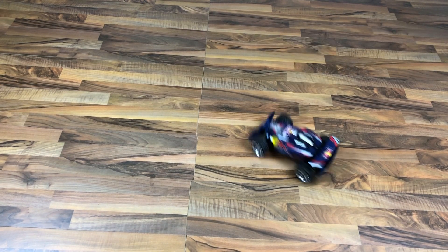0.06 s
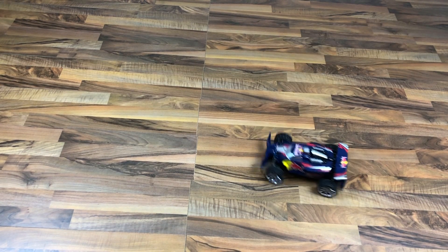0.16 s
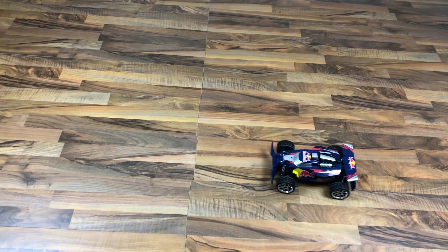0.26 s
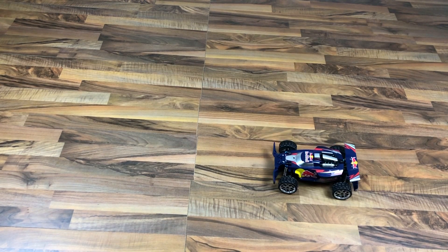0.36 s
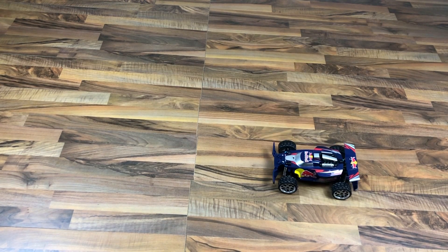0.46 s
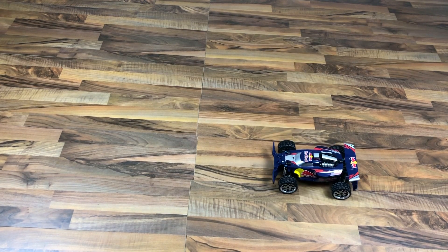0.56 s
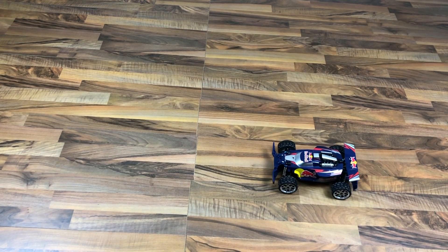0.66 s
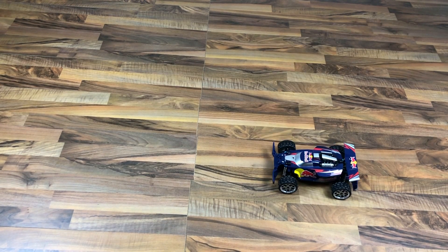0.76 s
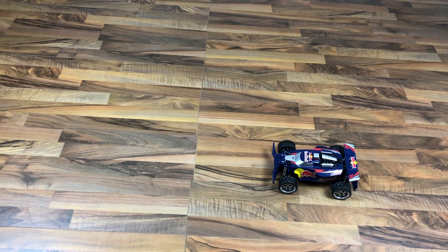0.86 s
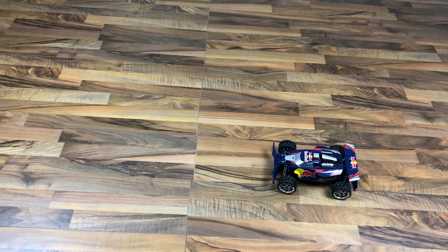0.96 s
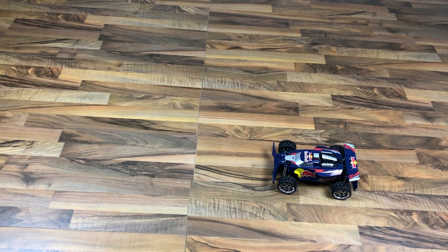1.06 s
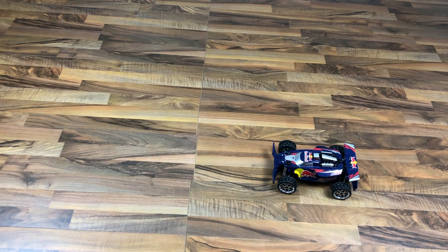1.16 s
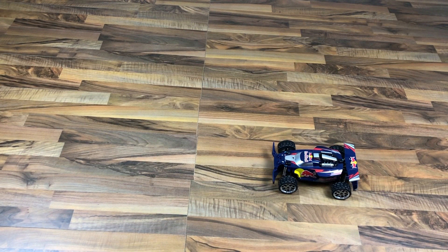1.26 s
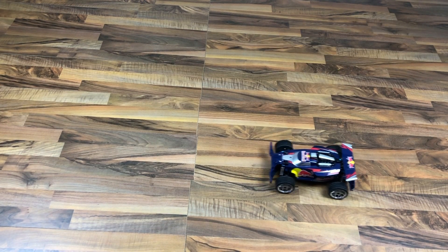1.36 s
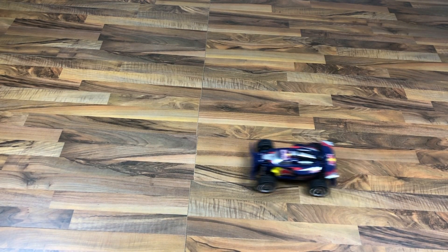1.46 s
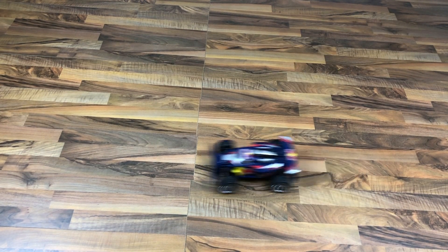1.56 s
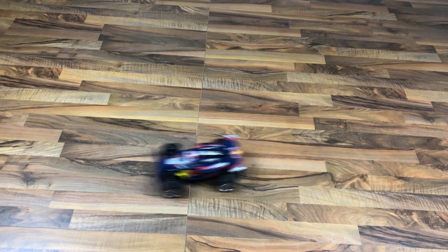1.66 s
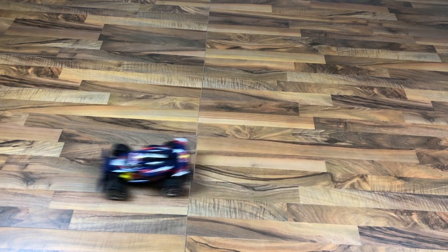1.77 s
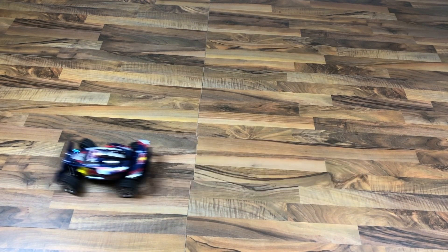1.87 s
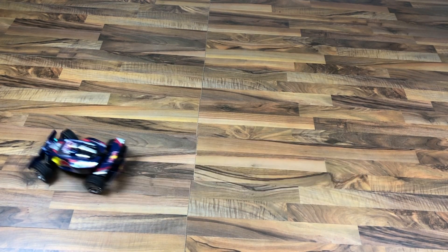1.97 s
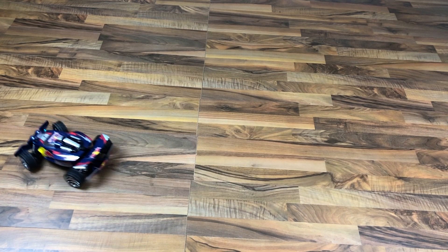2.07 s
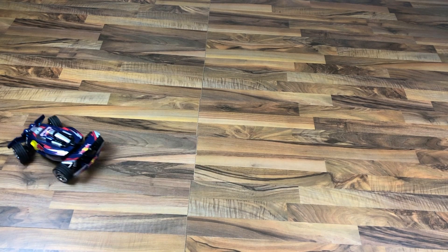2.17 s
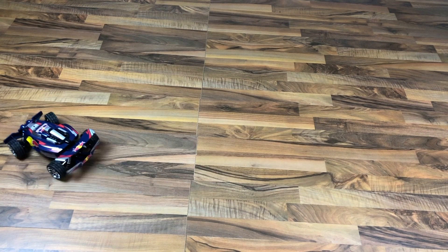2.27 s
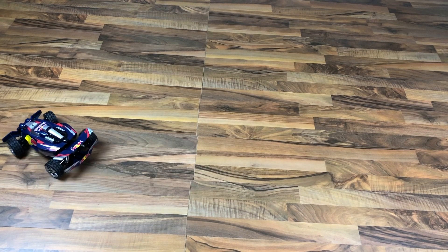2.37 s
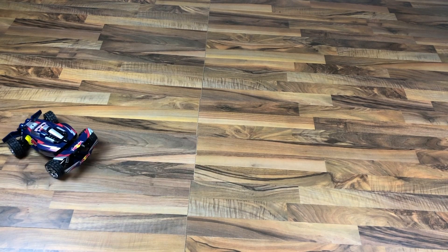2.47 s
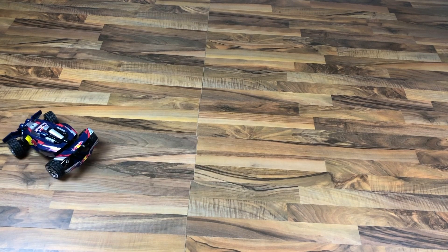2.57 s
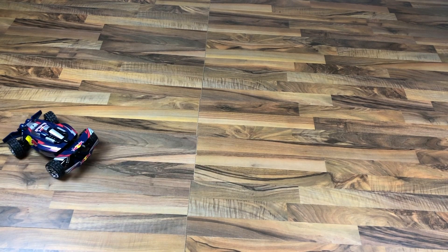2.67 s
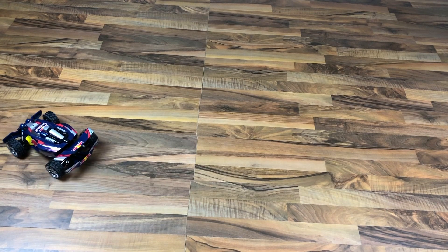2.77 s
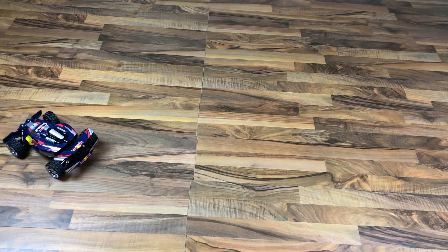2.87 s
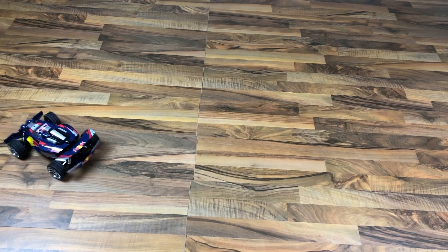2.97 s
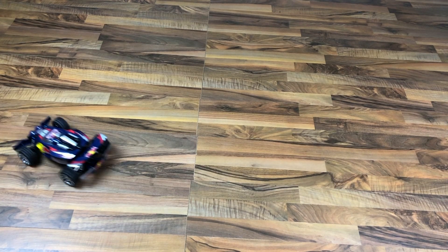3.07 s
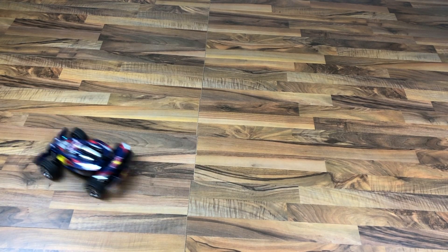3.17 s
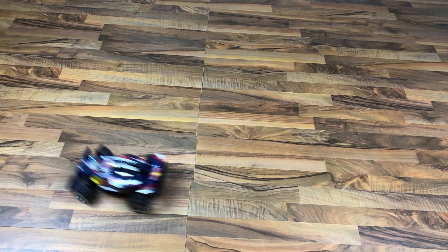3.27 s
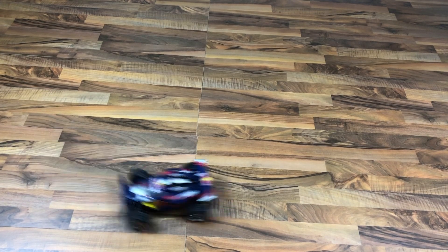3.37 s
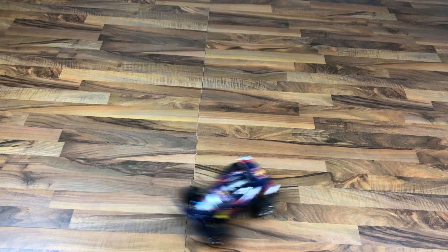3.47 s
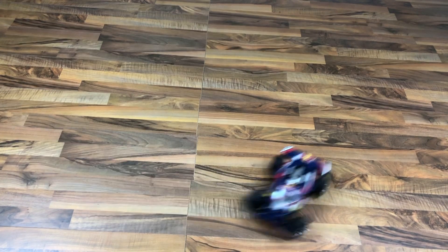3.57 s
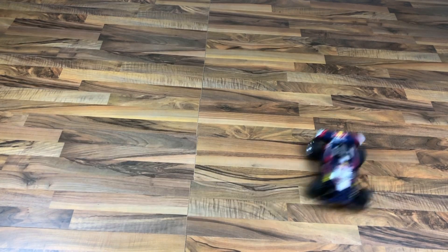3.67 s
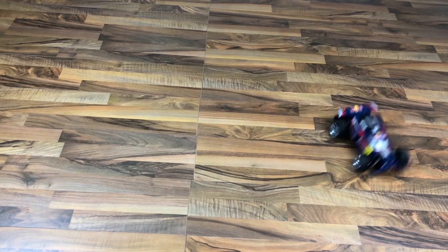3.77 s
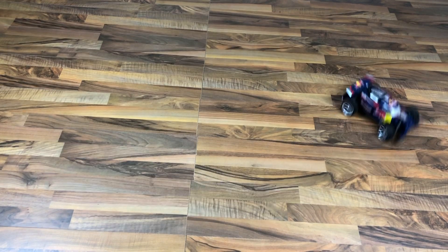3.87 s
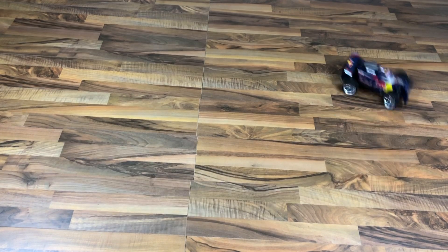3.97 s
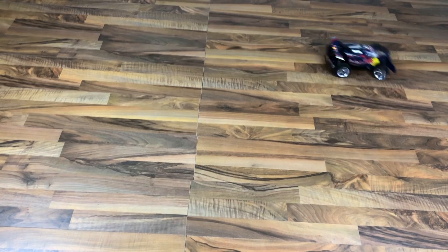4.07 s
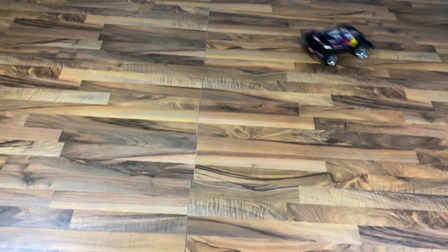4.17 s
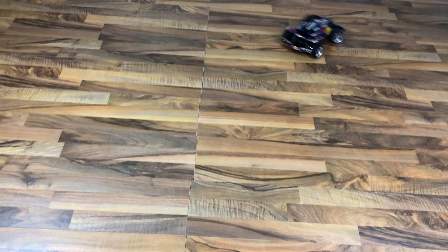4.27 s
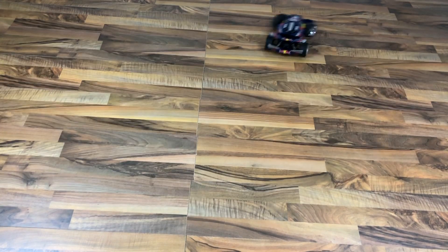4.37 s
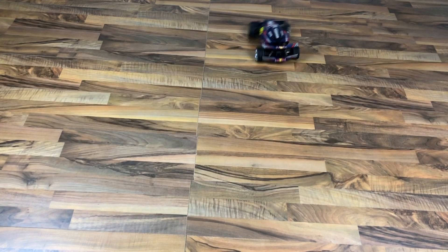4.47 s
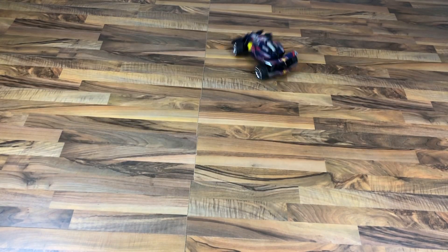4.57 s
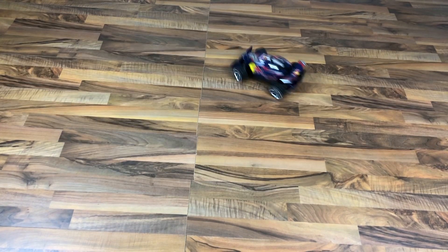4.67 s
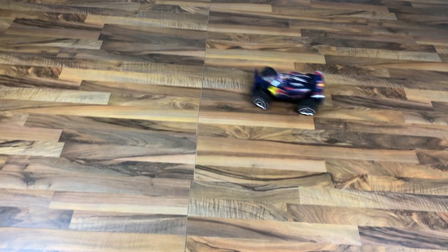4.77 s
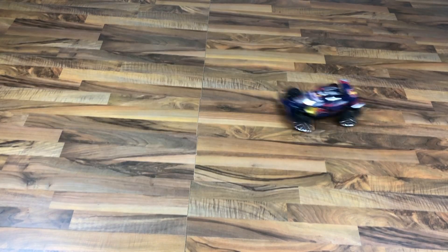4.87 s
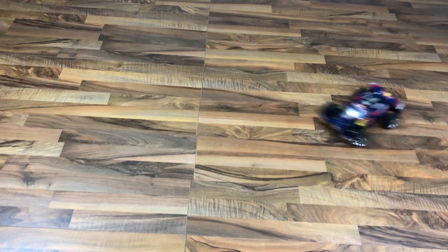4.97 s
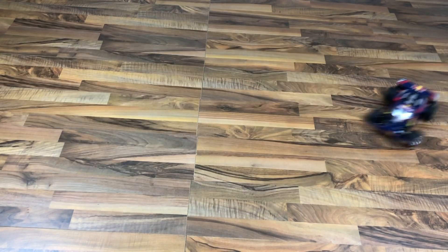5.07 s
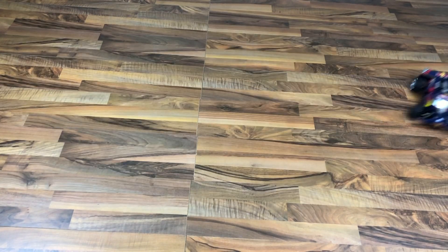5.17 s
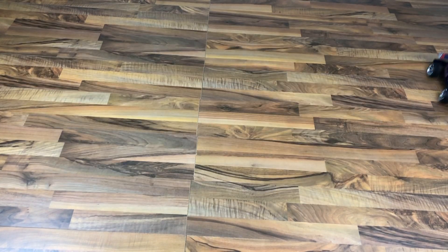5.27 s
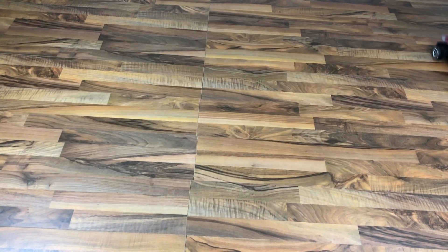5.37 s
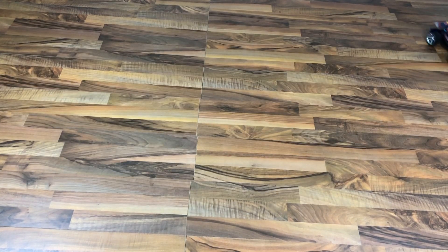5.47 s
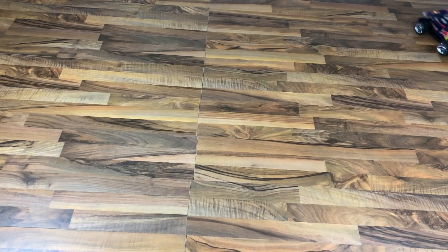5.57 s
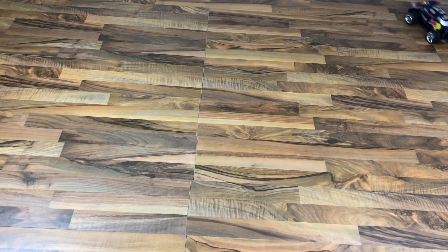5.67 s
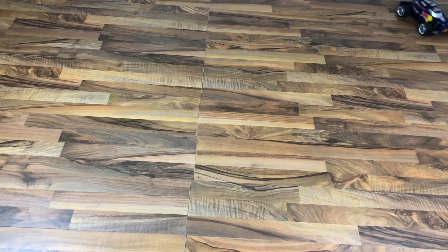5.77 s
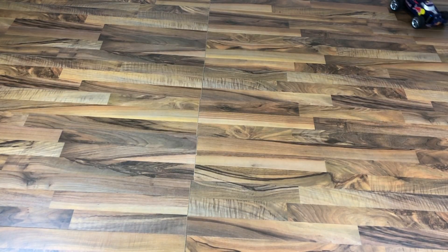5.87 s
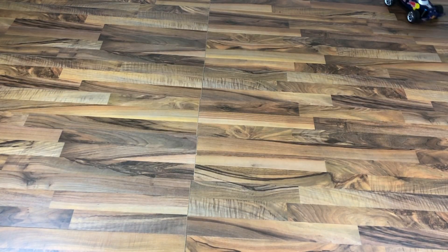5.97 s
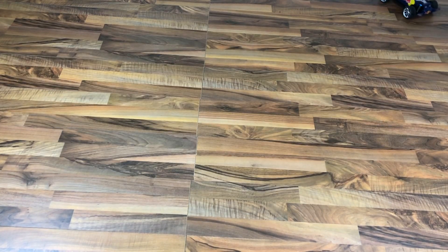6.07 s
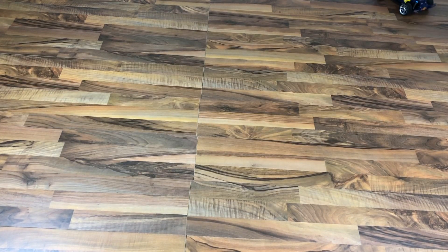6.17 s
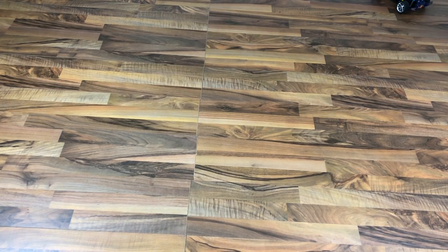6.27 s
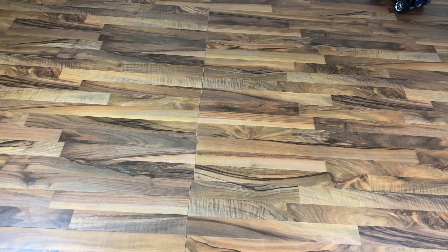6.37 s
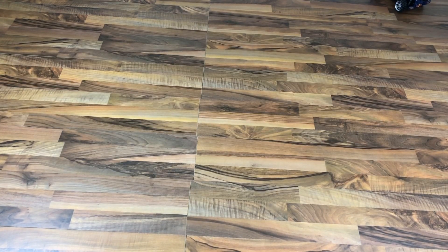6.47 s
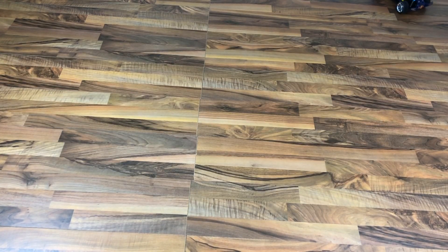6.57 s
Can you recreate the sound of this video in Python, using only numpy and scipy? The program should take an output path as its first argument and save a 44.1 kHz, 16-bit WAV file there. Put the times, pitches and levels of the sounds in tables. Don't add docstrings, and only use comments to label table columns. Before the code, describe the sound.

A small battery toy car whirs and rattles across a hard indoor floor in a short burst, then a long drive, clacking as it coasts out.

```python
import sys
import numpy as np
from scipy import signal
from scipy.io import wavfile
from scipy.ndimage import uniform_filter1d

SR = 44100
rng = np.random.default_rng(int(sys.argv[2]) if len(sys.argv) > 2 else 0)


def waveform_to_disk(signal):
    frames = np.transpose(np.atleast_2d(signal))
    scaled = np.clip(frames, -1, 1) * 32767
    samples = np.round(scaled).astype(np.int16)
    wavfile.write(sys.argv[1], SR, samples)


def invert_db(x):
    u = np.asarray(x, float) / 20
    return 10 ** u


N = 291942

# [t/s, level/dB]
GEAR_DRIVE = [
    [(0.0, -30), (0.15, -39), (0.32, -49), (0.358, -54), (0.41, -56)],
    [(1.395, -45.5), (1.453, -43), (1.513, -28), (1.625, -23), (1.765, -31.5), (2.179, -40.5),
     (2.352, -50.5)],
    [(2.986, -50), (3.015, -41), (3.035, -48), (3.07, -48), (3.125, -36), (3.22, -29), (3.36, -25.9),
     (3.9, -26.2), (5.158, -26.1), (5.34, -28.5)],
    [(5.342, -28.5), (5.378, -38), (5.468, -41.5), (5.802, -40.5), (6.13, -44), (6.2, -50), (6.29, -53.5),
     (6.48, -59), (6.575, -72)],
]
# [start t/s, spin-up/s, release t/s]
STARTS = [
    (1.394, .23, 1.75),
    (2.99, .37, 5.35),
    (6.576, .3, 7.0),
]
# [f/Hz, density/dB per Hz]
BODY_SPECTRUM = [(29, -40), (50, -15), (119, -8.5), (222, -7.5), (303, -4), (527, -12), (730, -12),
                 (880, -6), (1220, -4), (1630, -0.5), (2230, -5), (4060, -3), (11400, -8.5), (15600, -9.5)]
# [f/Hz, width/Hz, lift/dB]
SHELL_MODES = [(930, 82, 6.5), (1270, 90, 1), (1560, 260, 2.5), (1920, 170, 4), (3020, 200, .7),
               (4050, 400, 2.5), (5350, 450, 3), (7000, 300, 2), (8900, 120, 2.5), (11130, 350, 5.5),
               (13300, 200, 2.5)]
# [start t/s, end t/s, f/Hz, level/dB]
FLARES = [(0, .12, 1980, -42), (.06, .45, 1950, -48), (1.43, 1.5, 1900, -38), (1.492, 1.518, 1880, -28),
          (1.545, 1.615, 1840, -33), (2.25, 2.5, 1950, -54), (5.41, 5.46, 2020, -43), (5.9, 6.3, 930, -50),
          (4.45, 4.7, 4150, -37), (4.75, 5.05, 4150, -36), (3.6, 3.8, 4050, -37), (3.9, 4.25, 3050, -42),
          (5.7, 5.85, 4700, -49), (5.6, 5.8, 3650, -53), (5.61, 5.64, 5250, -49), (1.48, 1.58, 7100, -36),
          (1.52, 1.6, 5500, -34), (0, .16, 990, -47), (.12, 0.447, 985, -50), (1.6, 1.65, 4600, -30),
          (1.655, 1.72, 4720, -30), (1.54, 1.6, 4750, -35), (1.62, 1.68, 4050, -34),
          (1.66, 1.73, 3500, -33), (1.6, 1.69, 5400, -35), (1.98, 2.14, 1825, -51), (1.902, 2.15, 925, -47),
          (1.78, 2.1, 5600, -44), (2.35, 2.47, 1270, -51), (3.17, 3.26, 7350, -34), (3.26, 3.31, 7700, -33),
          (3.28, 3.345, 7250, -31), (4.02, 4.2, 5100, -34), (1.9, 2.35, 7300, -50), (3.25, 3.32, 940, -34),
          (3.3, 3.45, 5450, -34), (3.582, 3.66, 6050, -35), (3.65, 3.8, 4790, -35), (4.05, 4.25, 4050, -35),
          (4.85, 5.0, 5440, -32), (5.25, 5.36, 4100, -34), (5.65, 6.2, 1270, -46.5), (5.76, 6.3, 2055, -46),
          (1.45, 1.7, 9000, -34), (3.08, 3.17, 9900, -40), (.95, 1.0, 5000, -64), (1.15, 1.19, 4700, -72),
          (1.28, 1.33, 10300, -68)]
# [t/s, hold/s, level/dB, chassis re level/dB, hiss re
# level/dB]
SHUDDERS = [
    (0.413, .015, -45.5, 1, -10),
    (0.884, .01, -68, -10, -5),
    (1.008, .015, -66, 8, -6),
    (2.356, .115, -48, 1, -11),
    (2.5918, .004, -61, 8.5, -15),
    (2.999, .015, -49, -6, -3),
    (6.307, .065, -49, -2, -6),
    (6.38, .07, -47, -2, -6),
    (6.577, .05, -50, 4, -14),
]
# [t/s, hold/s, level/dB, chassis re level/dB, hiss re level/dB]
SWINGS = [
    (0.982, .075, -62, 1, 1),
    (1.306, .05, -66, 0, 7),
    (2.777, .06, -61.5, 4, 3),
]
# [t/s, rotation f/Hz, level/dB]
SHAFT_RUNS = [
    [(-.01, 390, -43), (.05, 310, -46), (.12, 232, -48)],
    [(1.44, 206, -65), (1.49, 240, -46), (1.57, 280, -39), (1.63, 312, -45), (1.668, 385, -38),
     (1.73, 305, -37), (1.775, 200, -52)],
    [(3.3, 211, -50), (3.41, 250, -44), (3.76, 328, -37), (3.93, 308, -41), (4.1, 310, -38),
     (4.25, 342, -51), (4.75, 335, -51), (4.96, 305, -38), (5.31, 280.5, -40.5)],
]
# [multiple, level/dB]
SHAFT_ORDERS = [
    (1, -3),
    (2, -15),
    (1.09, -10),
    (.6, -14),
]
# [t/s, f/Hz, level/dB]
MESH_RUNS = [
    [(1.46, 800, -50), (1.52, 1250, -41), (1.545, 1500, -37), (1.57, 1800, -36), (1.6, 1980, -35),
     (1.62, 1880, -40), (1.67, 1800, -40), (1.74, 1700, -47)],
    [(3.38, 1300, -46), (3.5, 1380, -44), (3.63, 1540, -39), (3.76, 1690, -36.5), (3.85, 1620, -43),
     (4.0, 1610, -39), (4.16, 1550, -35), (4.23, 1480, -46), (4.52, 1320, -48)],
    [(4.66, 1510, -43), (4.76, 1490, -37), (4.92, 1400, -41), (5.05, 1420, -44), (5.2, 1520, -42),
     (5.36, 1540, -43)],
]
# [start t/s, length/s, from f/Hz, to f/Hz, level/dB]
GLIDES = [(1.63, .14, 945, 860, -34), (1.53, .17, 1830, 1850, -30), (1.57, .05, 1930, 1990, -31),
          (1.4, .13, 1935, 1880, -39), (1.44, .09, 900, 1010, -44), (1.44, .1, 1330, 1260, -44),
          (3.08, .18, 715, 700, -51), (3.22, .38, 960, 835, -44), (3.66, .34, 860, 950, -44),
          (4.1, .14, 975, 960, -41), (4.32, .34, 705, 575, -42), (4.28, .2, 1040, 1100, -42),
          (4.48, .4, 1000, 820, -42), (5.07, .26, 945, 820, -41), (5.3, .13, 880, 970, -41),
          (4.22, .3, 350, 335, -44), (4.72, .16, 345, 340, -42), (.06, .06, 570, 540, -50),
          (0, .14, 1040, 985, -46), (.19, .13, 965, 955, -50), (3.25, .12, 390, 385, -47),
          (6.25, .2, 590, 600, -62), (6.57, .05, 590, 590, -58), (5.25, .14, 570, 565, -52),
          (.02, .11, 1740, 1720, -45), (.14, .2, 1960, 1910, -50), (.14, .1, 1740, 1720, -51),
          (.14, .1, 1220, 1215, -52), (.39, .06, 1195, 1195, -48), (.0, .07, 1370, 1350, -48),
          (1.43, .07, 485, 485, -50)]
# [start t/s, length/s, from f/Hz, to f/Hz, level/dB]
DRUMMING = [(-.02, .08, 190, 150, -43), (.11, .08, 105, 120, -50), (1.74, .24, 160, 118, -47),
            (2.04, .11, 160, 150, -53), (3.15, .3, 150, 150, -46), (4.25, .35, 85, 95, -48),
            (5.12, .3, 170, 158, -44), (5.4, .21, 128, 118, -42), (.15, .16, 85, 78, -53),
            (1.97, .2, 82, 76, -53), (5.58, .24, 86, 77, -45), (5.76, .2, 128, 128, -51),
            (1.68, .17, 90, 86, -53), (3.42, .17, 74, 72, -52), (5.47, .15, 235, 200, -52),
            (5.62, .1, 150, 150, -54), (6.0, .2, 150, 135, -57), (5.7, .12, 235, 220, -57)]
# [t/s, peak level/dB, chassis re peak/dB, top re peak/dB]
CLACKS = [(0.38, -33, -6, -17), (0.412, -27, -12, -21), (0.417, -24, -6, -21), (0.44, -35, -11, -24),
          (0.6204, -52, -1, -3), (0.8863, -51.5, -8, -8), (0.9465, -53, 0.5, -9), (1.0029, -42, -3, -11),
          (1.009, -48, 4, -14), (1.1548, -53, 3, -18), (1.2745, -52, -6, -4), (1.289, -50, -12, -5),
          (1.3985, -24, -3, -19), (1.492, -20, -9, -12), (2.3565, -25, -9, -21), (2.378, -28, -4.5, -19),
          (2.395, -28, -8.5, -19), (2.426, -32, -13, -19), (2.452, -38, -8, -20), (2.5455, -58, 3, -20),
          (2.5898, -40, 1, -19.5), (2.7456, -48, -10, -6), (2.7606, -46, -12, -6), (2.7686, -33, -2, -8),
          (2.786, -46, 6, -14), (2.815, -44.5, 7, -21), (2.9875, -37, -2.5, -6), (2.9995, -26, -7, -8),
          (6.2359, -28, -14, -14), (6.2923, -30, -16, -16), (6.308, -23.5, -8.5, -17),
          (6.345, -28, -10, -3), (6.3812, -18, -10, -21), (6.4015, -24, -9.5, -14), (6.4194, -32, -12, -16),
          (6.4512, -26, -19, -20), (6.4737, -29, -6, -20)]
# [t/s, peak level/dB]
TICKS = [(.2009, -32), (.2967, -34), (1.893, -26), (1.992, -27), (2.2921, -37), (2.3221, -38), (5.558, -30),
         (6.0309, -33), (6.191, -38), (6.268, -40), (5.4717, -29), (5.4996, -31), (5.6133, -28),
         (5.6831, -26), (5.7154, -29), (5.759, -19), (5.7865, -23), (5.8064, -23), (5.8408, -24),
         (5.8665, -33), (5.8932, -31), (5.9416, -27), (5.9491, -25), (5.9695, -27), (5.996, -28),
         (6.0596, -26), (6.0907, -26), (6.165, -28), (6.219, -30)]
# [f/Hz, width/Hz, lift/dB]
RIB_MODES = [
    (960, 80, 7),
    (1270, 90, 5),
    (2000, 140, 5),
    (3620, 200, 6),
    (4700, 220, 8),
    (6750, 300, 5),
    (11120, 220, 4),
]
# [t/s, f/Hz, peak level/dB, T60/s]
PINGS = [(2.5898, 1150, -42, .03), (2.5898, 4700, -52, .02), (2.604, 1150, -50, .04),
         (2.7686, 1000, -37, .035), (2.7686, 4750, -44, .025), (2.785, 1050, -42, .03),
         (2.815, 2100, -46, .03), (2.819, 620, -48, .06), (2.9985, 11000, -33, .03),
         (2.9995, 4500, -36, .04), (2.9995, 6300, -37, .03), (3.011, 9700, -34, .03),
         (3.012, 4400, -38, .03), (3.021, 9300, -39, .02), (6.3812, 3500, -33, .025),
         (6.3812, 1800, -34, .025), (1.009, 600, -56, .06), (6.091, 11100, -40, .05),
         (6.452, 11100, -44, .06)]
# [t/s, rise/s, hold/s, level/dB]
WHINES = [
    (1.394, .012, .032, -39),
    (2.998, .022, .034, -35),
    (6.575, .01, .05, -43.5),
]
# [multiple, level at start 1/dB, at start 2/dB, at start 3/dB]
WHINE_ORDERS = [
    (1, -12, -21, -16),
    (2, 0.5, 0, -1.5),
    (3, -14, -21, -5.5),
    (4, -3, -5, -4),
    (5, -21, -21, -12),
    (6, -20, -24, -22),
    (8, -16.5, -23, -4),
    (10, -24, -23, -20),
]
# [start t/s, length/s, level/dB]
STEER_WHISTLES = [(.492, .03, -55), (.545, .025, -54), (.61, .02, -55.5), (.935, .03, -54),
                  (.985, .05, -54), (1.266, .016, -52), (1.288, .025, -52), (1.335, .022, -52),
                  (1.375, .02, -57), (2.25, .09, -59), (2.732, .03, -53), (2.775, .075, -58),
                  (5.93, .06, -56), (6.11, .05, -56), (6.445, .12, -57)]
# [f/Hz, density/dB per Hz]
QUIET_SPECTRUM = [(15, -44), (25, 2), (137, -4), (222, -9), (275, -13), (951, -18), (1250, -23.5),
                  (1590, -25.5), (11700, -34.5), (14500, -33.5), (15700, -37)]
GROUP_EDGES_HZ = [230, 760, 2500, 4500, 9000]

QUIET_DB, CUTOFF_HZ = -63, 15790
ROOM_T60_S, ROOM_DB = .35, -12
FULL_DB = -26
CHASSIS, HISS, DRONE, ROLLING = (-31.2, .75), (-28, 1.15), (-39.5, .82), (-48.5, .42)
SPIN_SHARES = (0, .3, .55, 1)
SPIN_HISS_DB, SPIN_STRAIN_DB, SPIN_CLATTER_DB = (-5, 8, 4, 0), (2.5, 3.5, 1, 0), (0, -1, -4, 0)
AFTER_S, AFTER_DRONE_DB, AFTER_CLATTER_DB = (0, .08, .45, .8), (1, 4, -4, -9), (0, -.6, -2.2, -1.5)
SLACK_HELD_DB, SLACK_FREE_DB, SLACK_SLOW_DB, FREE_S, SLOW_S = .42, 1.4, 2.2, .2, .75
STRIKES_PER_S, STRIKE_FADE_S = 70, .007
WANDER_SAMPLES, WANDER_PER_S = 28, 2.5
SWELL_S, SWELL_DB, FALL_S, TAIL_S, TAIL_DB_PER_S = .036, 8, .06, .2, 125
HOLD_SAG_DB_PER_S, FALL_DB_PER_S, SHUDDER_DRONE_DB, SWING_DRONE_DB = 35, 280, -21, -5
SAG_HZ_PER_S, LET_GO_S, LET_GO_DB, RUN_OUT_S, RUN_OUT_DB = 260, .09, 9, .34, 15
DRUM_RISE, DRUM_FALL, DRUM_ENDS_DB = .25, .3, 11
WHINE_HZ, WHINE_FALL_S, WHINE_LINGER_S = 485, .012, .07
WHINE_START_DB, WHINE_HOLD_DB, WHINE_FALL_DB = 10, 2, 10
STEER_HZ, STEER_RISE_S, STEER_FALL_S, STEER_RISE_DB, STEER_FALL_DB = 15680, .015, .04, 8, 22


def gears(per_s, size_db, smooth):
    knocks = rng.random((2, N)) < per_s * invert_db(3.0 * drift(60)) / SR
    sizes = invert_db(size_db * np.minimum(rng.exponential(1, (2, N)), 4)) * rng.choice([-1, 1], (2, N))
    shake = rms_one(knocks * sizes) + smooth * rng.standard_normal((2, N))
    shake = fine_modes(shell(shake, SHELL_MODES), lift_db=3.2, count=44)

    roll, drone, chassis, clatter, rattle, hiss = bank(shake, BODY_SPECTRUM, patchy_db=.8, step=.38)
    rattle = clatter * invert_db(since_start(SPIN_CLATTER_DB) + since_release(AFTER_CLATTER_DB)) + rattle
    roll, drone, chassis, rattle, hiss = [rms_one(g) for g in (roll, drone, chassis, rattle, hiss)]

    lumps = invert_db(slack() * (strikes() - .3))
    chassis = chassis * lumps ** .6
    rattle = rattle * lumps
    hiss = hiss * lumps ** 1.2

    swing = in_time(GEAR_DRIVE, column=1) / invert_db(FULL_DB)
    strain = invert_db(since_start(SPIN_STRAIN_DB))

    def follows(full_db, share):
        return invert_db(full_db) * swing ** share

    rattle_gain = follows(FULL_DB, share=1) + shudders(column=0)
    chassis_gain = follows(*CHASSIS) * strain + shudders(column=1)
    hiss_gain = follows(*HISS) * invert_db(since_start(SPIN_HISS_DB)) + shudders(column=2)
    drone_gain = follows(*DRONE) * strain * invert_db(since_release(AFTER_DRONE_DB)) + shudders(column=3)
    return (rattle * rattle_gain + chassis * chassis_gain + hiss * hiss_gain
            + drone * drone_gain + roll * follows(*ROLLING))


def slack():
    points = [(0, SLACK_HELD_DB), (FREE_S, SLACK_FREE_DB), (SLOW_S, SLACK_SLOW_DB)]
    for s, spin, off in STARTS:
        points += [(s, SLACK_FREE_DB), (s + .6 * spin, SLACK_HELD_DB), (off, SLACK_HELD_DB)]
        points += [(off + FREE_S, SLACK_FREE_DB), (off + SLOW_S, SLACK_SLOW_DB)]
    return np.interp(np.arange(N) / SR, *np.transpose(points))


def strikes():
    caught = (rng.random(N) < STRIKES_PER_S / SR) * rng.uniform(.4, 1, N)
    fading = np.sqrt(signal.lfilter([1], [1, -np.exp(-1 / (STRIKE_FADE_S * SR))], caught))
    return rms_one(fading - np.mean(fading))


def shudders(column):
    tables = []
    kinds = ((SHUDDERS, SHUDDER_DRONE_DB, []), (SWINGS, SWING_DRONE_DB, [(SWELL_S, SWELL_DB)]))
    for table, drone_db, swell in kinds:
        for s, hold, db, *balance_db in table:
            db = db + (0, *balance_db, drone_db)[column]
            held_db = db - HOLD_SAG_DB_PER_S * hold
            fallen_s, fallen_db = s + hold + FALL_S, held_db - FALL_DB_PER_S * FALL_S
            rows = [(s - lead, db - under_db) for lead, under_db in swell]
            rows += [(s, db), (s + hold, held_db), (fallen_s, fallen_db)]
            rows += [(fallen_s + TAIL_S, fallen_db - TAIL_DB_PER_S * TAIL_S)]
            tables.append(rows)
    return in_time(tables, column=1)


def since_start(step_db):
    t = np.arange(N) / SR
    return sum(np.interp((t - s) / spin, SPIN_SHARES, step_db, left=0, right=0) for s, spin, _ in STARTS)


def since_release(step_db):
    t, out = np.arange(N) / SR, np.zeros(N)
    releases = [0] + [row[2] for row in STARTS]
    for off, again in zip(releases, [row[0] for row in STARTS]):
        at = (t >= off) & (t < again)
        out[at] = np.interp(t[at] - off, AFTER_S, step_db)
    return out


def resonate(x, hz, width_hz):
    r = np.exp(-np.pi * width_hz / SR)
    poles = [1, -2 * r * np.cos(2 * np.pi * hz / SR), r * r]
    return signal.lfilter(np.array([1, 0, -1]) * (1 - r * r) / 2, poles, x)


def shell(x, modes):
    return x + sum((invert_db(lift_db) - 1) * resonate(x, hz, width) for hz, width, lift_db in modes)


def fine_modes(x, lift_db, count):
    rings = 0
    for hz in np.geomspace(700, 14500, count) * rng.uniform(.99, 1.01, count):
        ring = resonate(x[0], hz, 18 + .0035 * hz)
        ring = np.interp(np.arange(N) + WANDER_SAMPLES * drift(WANDER_PER_S), np.arange(N), ring)
        rings = rings + ring * invert_db(lift_db + 5.2 * np.minimum(drift(16.0), 2.2))
    return x + rings


def flares(width_hz):
    out = np.zeros(N)
    for start, end, hz, db in FLARES:
        a, b = round(start * SR), round(end * SR)
        r = np.exp(-np.pi * width_hz * np.sqrt(hz / 1000) / SR)
        poles = [1, -2 * r * np.cos(2 * np.pi * hz / SR), r * r]
        ring = signal.lfilter([1], poles, rng.standard_normal(N // 6))
        ring = ring / uniform_filter1d(ring ** 2, size=1500) ** .3
        out[a:b] += invert_db(db) * rms_one(ring[2000:2000 + b - a]) * np.sqrt(np.hanning(b - a))
    return out


def shaft():
    return sum(turning(run_down(rows), SHAFT_ORDERS, wobble=.035, flutter_db=3.5) for rows in SHAFT_RUNS)


def run_down(rows):
    s, hz, db = rows[-1]
    return rows + [(s + LET_GO_S, hz - SAG_HZ_PER_S * LET_GO_S, db - LET_GO_DB),
                   (s + RUN_OUT_S, hz - SAG_HZ_PER_S * RUN_OUT_S, db - RUN_OUT_DB)]


def pinion():
    rough = invert_db(3.5) * sum(mesh(rows, width_hz=60, flutter_db=2.4) for rows in MESH_RUNS)
    return rough + sum(turning(slide(*row), [(1, -1.5)], wobble=.012, flutter_db=3.0) for row in GLIDES)


def mesh(rows, width_hz, flutter_db):
    out, gain = np.zeros(N), in_time([rows], column=2)
    at = np.flatnonzero(gain)
    phase = 2 * np.pi * np.cumsum(np.interp(at / SR, *np.transpose(rows)[:2])) / SR
    band = drift(width_hz, size=len(at)) * np.sin(phase) + drift(width_hz, size=len(at)) * np.cos(phase)
    out[at] = invert_db(flutter_db * drift(14, size=len(at))) * band
    return out * gain


def wheels():
    return sum(turning(slide(*row), [(1, -0.67)], wobble=.03, flutter_db=2.5) for row in DRUMMING)


def slide(start, length, from_hz, to_hz, db):
    shares, ends = np.array([0, DRUM_RISE, 1 - DRUM_FALL, 1]), np.array([1, 0, 0, 1])
    return np.transpose([start + length * shares, from_hz + (to_hz - from_hz) * shares,
                         db - DRUM_ENDS_DB * ends])


def turning(rows, orders, wobble, flutter_db):
    out, gain = np.zeros(N), in_time([rows], column=2)
    at = np.flatnonzero(gain)
    hz = np.interp(at / SR, *np.transpose(rows)[:2])
    turns = np.cumsum(hz * (1 + wobble * drift(25.9, size=len(at)))) / SR
    for k, db in orders:
        out[at] += invert_db(db + flutter_db * drift(24, size=len(at))) * np.sin(2 * np.pi * k * turns)
    return np.sqrt(2) * out * gain


def blows():
    ticks = [(*row, -11, -6) for row in TICKS]
    struck = clacks(CLACKS, trim_db=-2.5, t60=.03) + clacks(ticks, trim_db=-4.2, t60=.05)
    return shell(struck, RIB_MODES) + pings()


def clacks(events, trim_db, t60):
    out, t = np.zeros(N + 2000), np.arange(2000) / SR
    bands = [(2500, 9000), (600, 2500), (9000, 16500)]
    bursts = rng.standard_normal((len(events), 2000))
    bursts[:, 0] = 3.5
    for column, (edge, longer) in enumerate(zip(bands, (1, 2.2, .7))):
        band = signal.butter(2, edge, "band", fs=SR, output="sos")
        for row, blow in zip(events, signal.sosfilt(band, bursts * invert_db(-60 * t / (t60 * longer)))):
            at, balance_db = round(row[0] * SR), (0, *row[2:])[column]
            out[at:at + 2000] += invert_db(row[1] + balance_db + trim_db) * blow / np.abs(blow).max()
    return out[:N]


def pings():
    out, t = np.zeros(N), np.arange(3000) / SR
    for s, hz, db, t60 in PINGS:
        out[round(s * SR):][:3000] += invert_db(db - 60 * t / t60) * np.sin(2 * np.pi * hz * t)
    return out


def controller():
    t, whine, starts, swings = np.arange(N) / SR, 0, [], []
    for s, rise, hold, db in WHINES:
        held = s + rise + hold
        rows = [(s, db - WHINE_START_DB), (s + rise, db), (held, db - WHINE_HOLD_DB)]
        rows += [(held + WHINE_FALL_S, db - WHINE_FALL_DB), (held + WHINE_LINGER_S, db - WHINE_FALL_DB - 3.0)]
        starts.append(in_time([rows], column=1))
    for k, *levels_db in WHINE_ORDERS:
        partial = np.sin(2 * np.pi * k * WHINE_HZ * t + k * k + .3 * drift(60))
        whine = whine + partial * invert_db(2.2 * drift(40)) * (invert_db(levels_db) @ starts)
    for s, length, db in STEER_WHISTLES:
        swings.append([(s, db - STEER_RISE_DB), (s + STEER_RISE_S, db), (s + length, db),
                       (s + length + STEER_FALL_S, db - STEER_FALL_DB)])
    whistle = invert_db(2.5 * drift(22)) * np.sin(2 * np.pi * STEER_HZ * t + .3 * drift(60))
    return np.sqrt(2) * (whine + whistle * in_time(swings, column=1))


def room(x):
    t = np.arange(round(.5 * SR)) / SR
    tail = rng.standard_normal(len(t)) * invert_db(-60 * t / ROOM_T60_S) * (t > .004)
    tail = signal.lfilter([.5], [1, -.45], tail)
    return x + invert_db(ROOM_DB) * signal.fftconvolve(x, tail / np.sqrt(np.sum(tail ** 2)))[:N]


def room_quiet():
    bands = bank(rng.standard_normal((2, N)), QUIET_SPECTRUM, patchy_db=1.2, step=.5)
    return invert_db(QUIET_DB) * rms_one(bands.sum(axis=0))


def bank(sources, spectrum, patchy_db, step):
    groups, edges = np.zeros((6, N)), 19000 * 2 ** np.arange(-9.5, .01, step)
    for k, (low, high) in enumerate(zip(edges, edges[1:])):
        sos = signal.butter(2, [low, high], "band", fs=SR, output="sos")
        band = signal.sosfilt(sos, sources[k % 2])
        hz = min(np.sqrt(low * high), CUTOFF_HZ)
        gain = invert_db(at_hz(spectrum, hz) + patchy_db * drift(5.9))
        groups[np.searchsorted(GROUP_EDGES_HZ, hz)] += band * gain
    return groups


def at_hz(points, hz):
    return np.interp(np.log(hz), np.log(np.array(points)[:, 0]), np.array(points)[:, 1])


def drift(rate, size=N):
    r = np.exp(-80 * np.pi * rate / SR)
    slow = signal.lfilter([1], [1, -2 * r, r * r], rng.standard_normal(N // 40 + 2002))[2000:]
    return np.interp(np.arange(size) / 40, np.arange(len(slow)), rms_one(slow))


def in_time(tables, column):
    gain = np.zeros(N)
    for rows in tables:
        rows = np.array(rows)
        first, last = round(rows[0, 0] * SR) - 88, round(rows[-1, 0] * SR) + 88
        at = np.arange(max(first, 0), min(last, N))
        ends = np.clip(np.minimum(at - at[0], at[-1] - at) / 88, 0, 1)
        gain[at] += ends * invert_db(np.interp(at / SR, rows[:, 0], rows[:, column]))
    return gain


def rms_one(x):
    return x / np.sqrt(np.mean(x ** 2) + 1e-20)


def scene():
    rattle = gears(per_s=3500, size_db=2.5, smooth=0.77) + flares(width_hz=55)
    mono = rattle + room(shaft() + pinion() + blows()) + wheels() + controller() + room_quiet()
    return np.array([mono, mono])


def low_pass(x):
    return signal.sosfilt(signal.butter(12, 17090, fs=SR, output="sos"), x)


def record(dry):
    mono = signal.sosfilt(signal.butter(3, 42, "high", fs=SR, output="sos"), dry[0])
    mono = signal.sosfilt(signal.ellip(12, .5, 75, CUTOFF_HZ, fs=SR, output="sos"), mono)
    return low_pass(np.array([mono, mono]))


dry = scene()
out = record(dry)
waveform_to_disk(out)
```